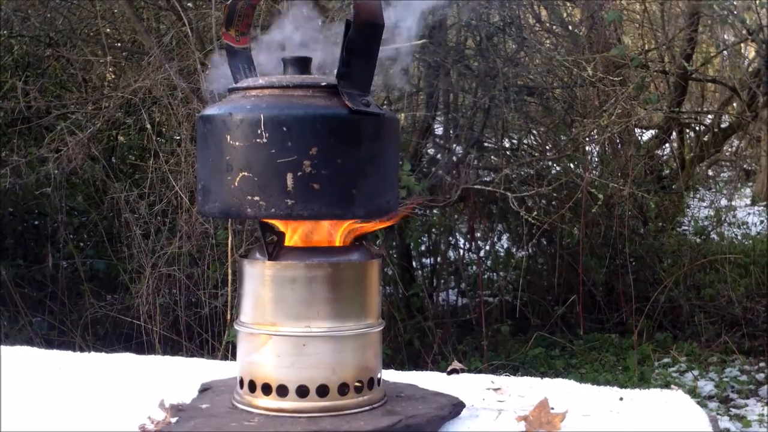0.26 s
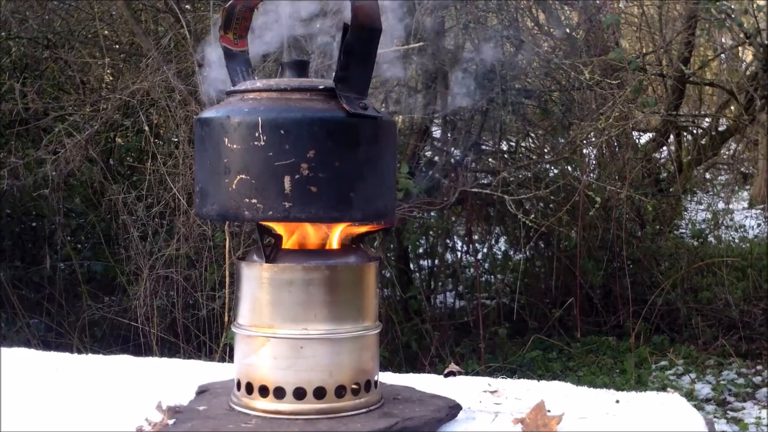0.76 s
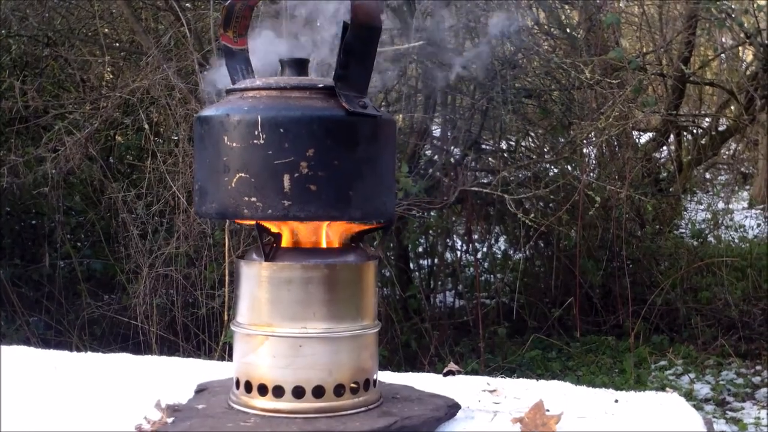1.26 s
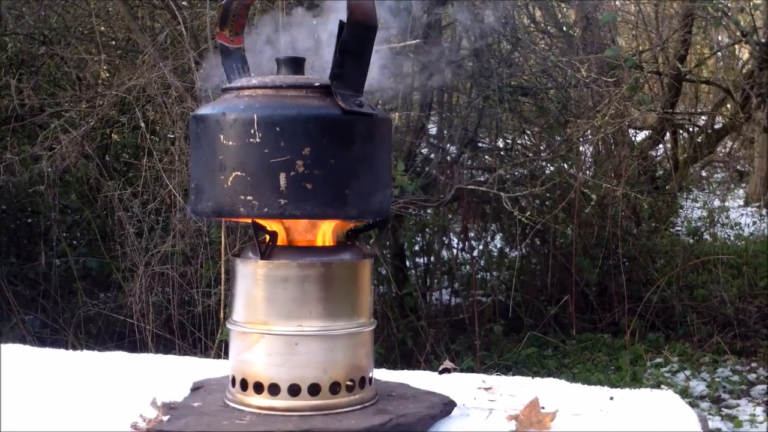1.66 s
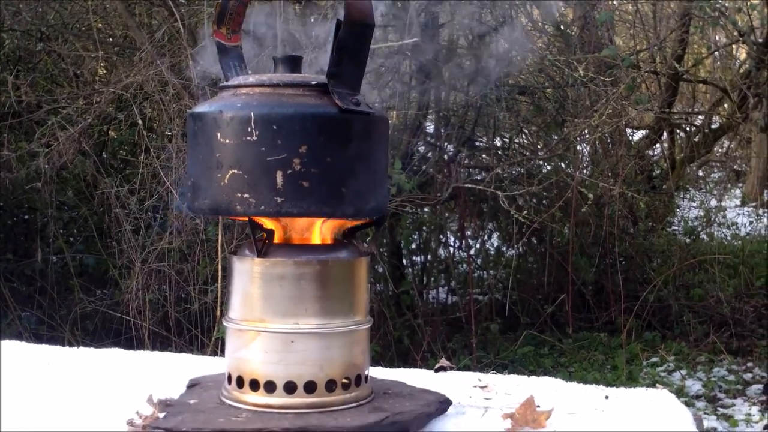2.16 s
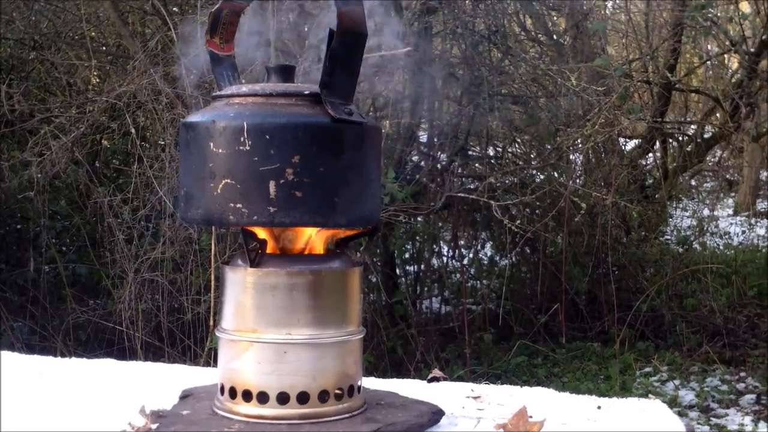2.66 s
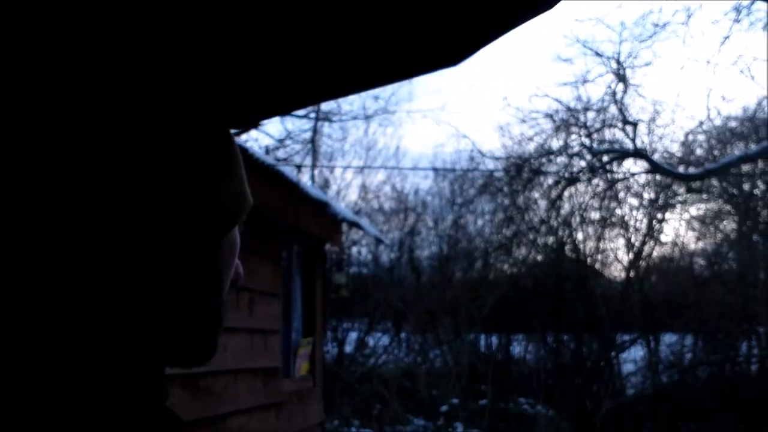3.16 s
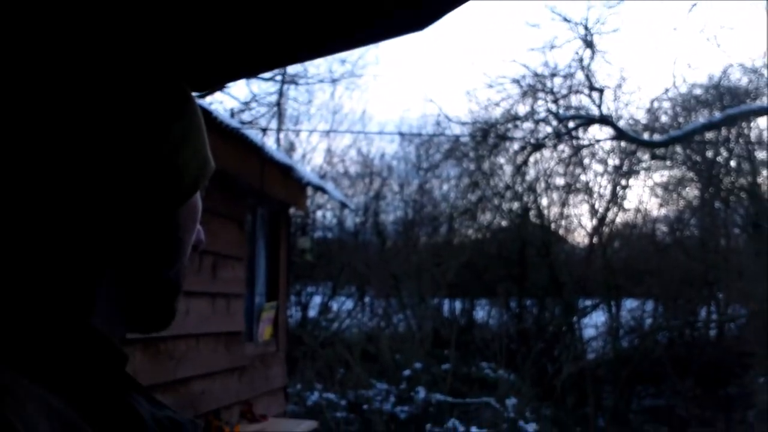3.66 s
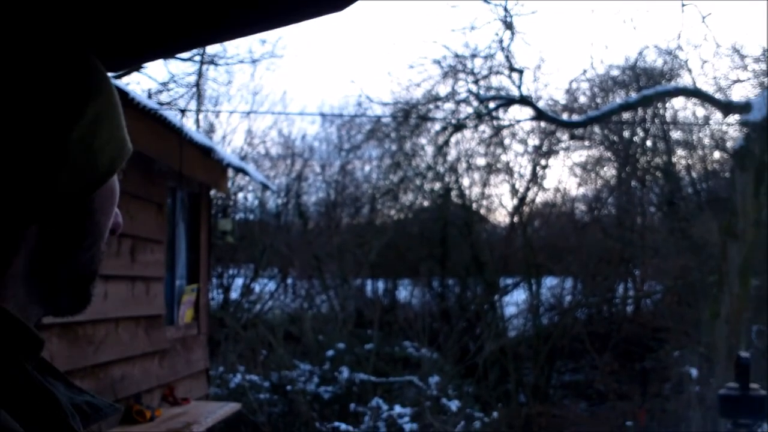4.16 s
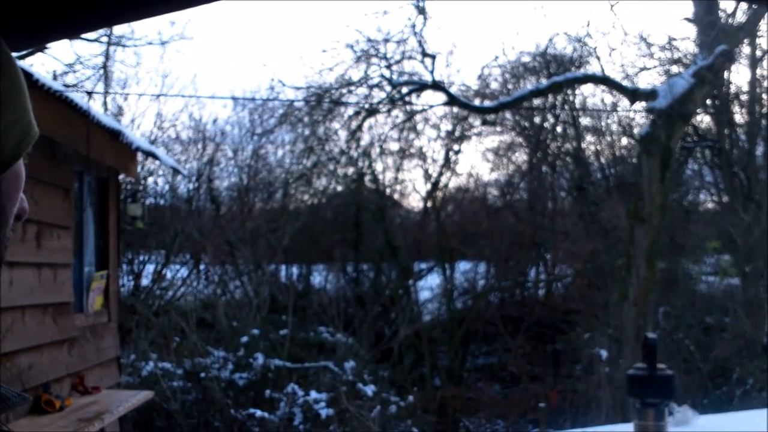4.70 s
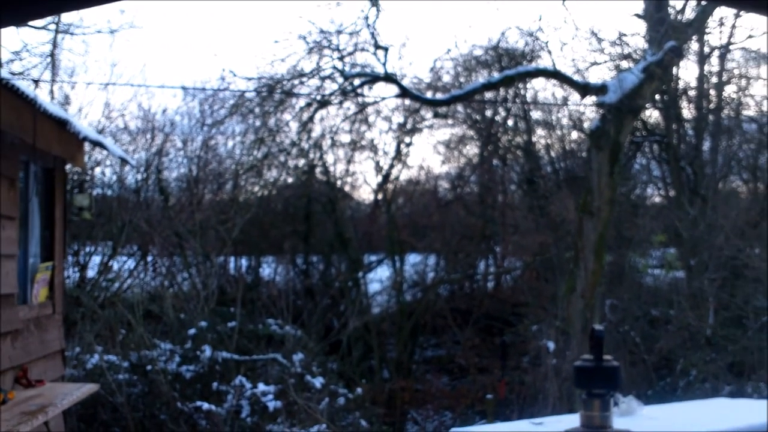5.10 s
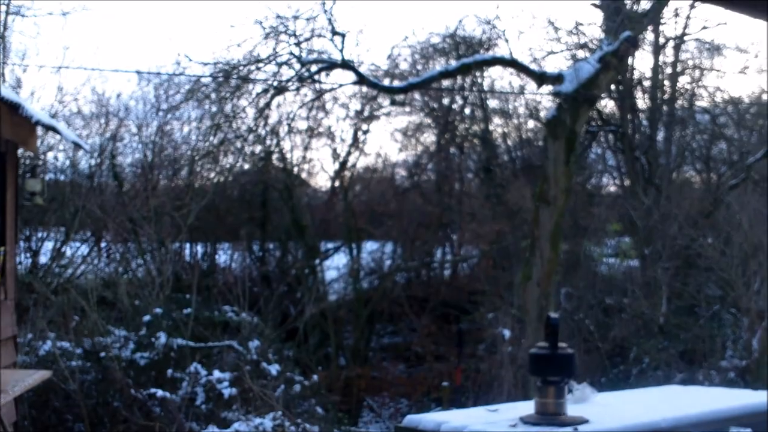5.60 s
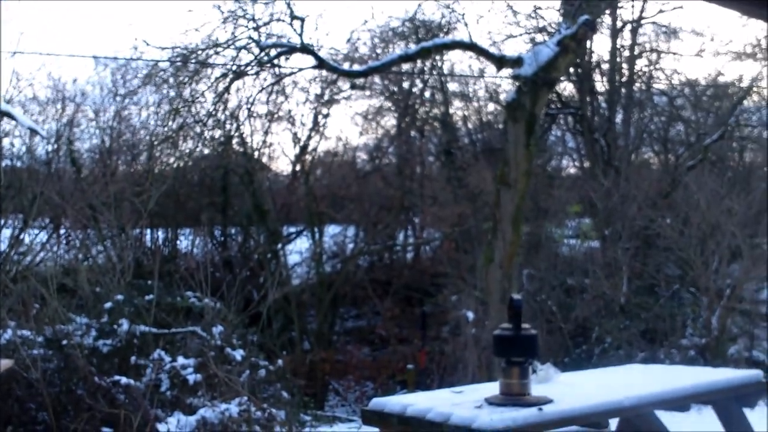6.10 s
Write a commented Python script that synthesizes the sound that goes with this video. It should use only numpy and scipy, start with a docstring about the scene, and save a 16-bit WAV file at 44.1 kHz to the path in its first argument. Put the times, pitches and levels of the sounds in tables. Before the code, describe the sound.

Close flame flutter and kettle steam hiss give way to faint outdoor ambience and sparse fire crackles, with wind bumping the microphone.

```python
"""Wood-gas stove and snowy garden

A small stove burns close by under a steaming kettle: flame flutter, gas roar, steam hiss round the lid.
It fades, the sound drops out briefly, and a quiet garden remains: distant wash, wood snapping in a fire
a few metres off, faint birds. Wind slowly pushes the microphone membrane in both scenes."""
import sys
import numpy as np
from scipy import signal
from scipy.fft import rfft, irfft
from scipy.io import wavfile
from scipy.ndimage import uniform_filter1d

SR = 44100
rng = np.random.default_rng(int(sys.argv[2]) if len(sys.argv) > 2 else 0)


def generate_wav(sig):
    """Save sig (samples, or channels by samples) to the path in sys.argv[1] as 16-bit PCM at SR."""
    pcm = np.round(np.clip(np.atleast_2d(sig).T, -1, 1) * 32767).astype(np.int16)
    wavfile.write(sys.argv[1], SR, pcm)


N = 279623
CUT_S, BACK_S = 125323 / SR, 131082 / SR  # drop-out start, end

# far traffic and hiss: f/Hz, density/dB
WASH_SPECTRUM = [(200, -15), (340, -6.5), (426, -4.5), (577, -5), (606, -4.5), (1010, -5), (1980, -15),
                 (2180, -16.5), (2440, -19), (8010, -22.5), (8670, -22), (15700, -26)]


def amp(db):
    return 10 ** (np.asarray(db) / 20)


def unit_rms(x):
    return x / np.sqrt(np.mean(x ** 2) + 1e-20)


def add(mix, start_s, sound):
    part = mix[round(start_s * SR):][:len(sound)]
    part += sound[:len(part)]


def curve(rows):
    """Gain through rows of t/s, level/dB."""
    times_s, db = np.transpose(rows)
    return amp(np.interp(np.arange(N) / SR, times_s, db))


def ramp(start_db, start_s, db_per_s):
    """Gain that holds until start_s, then slides."""
    return amp(start_db + db_per_s * np.maximum(np.arange(N) / SR - start_s, 0))


def wander(size, span):
    """Noise averaged over span points, rms 1."""
    return unit_rms(uniform_filter1d(rng.standard_normal(size), span))


def puffs(depth_db, length_s=.055):
    """Randomly swelling and sagging gain."""
    span = round(length_s * SR)
    return amp(depth_db * unit_rms(uniform_filter1d(wander(N, span), span)))


def spectrum_db(spectrum, hz):
    """Rows of f/Hz, density/dB, interpolated over log frequency."""
    f, db = np.transpose(spectrum)
    return np.interp(np.log(hz + .1), np.log(f + .1), db, left=-90, right=-90)


def coloured(spectrum, size=N):
    """Noise of the given spectrum, rms 1."""
    gain = amp(spectrum_db(spectrum, np.fft.rfftfreq(size, 1 / SR)))
    return unit_rms(irfft(rfft(rng.standard_normal(size)) * gain, size))


def patchy(spectrum, patchy_db, flicker_db):
    """Noise with time-frequency patches and a broadband flicker, rms 1."""
    frames, hz = N // 256 + 5, np.fft.rfftfreq(1024, 1 / SR)
    real, imag, patches = rng.standard_normal((frames, 513, 3)).T
    patches = unit_rms(uniform_filter1d(uniform_filter1d(patches, 10, 0), 10, 1))
    db = spectrum_db(spectrum, hz)[:, None] + patchy_db * patches + flicker_db * wander(frames, 3)
    _, noise = signal.istft((real + 1j * imag) * amp(db), nperseg=1024, noverlap=768)
    return unit_rms(noise[:N])


def resonate(x, hz, width_hz):
    """Two equal resonators in series, gain 1; hz may vary."""
    carrier = np.exp(2j * np.pi * np.cumsum(hz * np.ones(len(x))) / SR)
    pole = np.exp(-np.pi * width_hz / SR)
    for _ in range(2):
        x = 2 * (carrier * signal.lfilter([1 - pole], [1, -pole], x / carrier)).real
    return x


def ringing(spectrum, size):
    """Minimum-phase impulse response of a spectrum."""
    log_gain = np.log(amp(spectrum_db(spectrum, abs(np.fft.fftfreq(size, 1 / SR)))))
    return np.fft.ifft(np.exp(np.conj(signal.hilbert(log_gain)))).real


def glides(notes, slide_share, waver):
    """Wavering sines that reach their end pitch after slide_share of their length."""
    out = np.zeros(N)
    for start_s, length_s, start_hz, end_hz, db in notes:
        u = np.linspace(0, 1, round(length_s * SR))
        hz = start_hz + (end_hz - start_hz) * np.minimum(u / slide_share, 1)
        hz *= 1 + waver * wander(8820, 120)[:len(u)]
        tone = np.sin(2 * np.pi * np.cumsum(hz) / SR)
        add(out, start_s, amp(db) * tone * signal.windows.tukey(len(u), .4))
    return out


def background():
    """Deep rumble, swelling drone, far traffic wash and a thin steady whine."""
    # f/Hz, density/dB
    rumble_spectrum = [(15, -20), (24, -3), (35, -6), (50, -8), (72, -9), (97, -16), (115, -18), (150, -45)]
    drone_spectrum = [(65, -27), (110, -13.5), (134, 2), (156, -4), (183, -5), (263, -11), (324, -20),
                      (340, -28), (440, -59), (750, -120)]
    # t/s, level/dB
    rumble_levels = [(3, -41), (3.4, -39), (3.65, -40.5), (3.85, -36.5), (4.2, -42.5), (4.55, -37.5),
                     (4.75, -38), (5.0, -40), (5.3, -39), (5.6, -38.5), (5.85, -38.5), (6.0, -41),
                     (6.3, -36.5)]
    drone_levels = [(3, -47.5), (3.35, -42.5), (3.65, -45.5), (3.88, -45.5), (4.1, -47.5), (4.4, -44),
                    (4.55, -49), (5.1, -50), (5.55, -52.5), (5.8, -51.5), (6.3, -51)]
    # f/Hz, level/dB
    whine_tones = [(8536.6, -73), (8606.3, -81)]
    out = curve(rumble_levels) * puffs(depth_db=1.7) * coloured(rumble_spectrum)
    out += curve(drone_levels) * puffs(depth_db=1.5) * coloured(drone_spectrum)
    out += ramp(-51, BACK_S, db_per_s=-.5) * patchy(WASH_SPECTRUM, patchy_db=1.1, flicker_db=.6)
    for hz, db in whine_tones:
        out += amp(db) * unit_rms(np.sin(2 * np.pi * (hz * np.arange(N) / SR + rng.random())))
    return out


def birds():
    """Far, short falling notes."""
    # t/s, length/s, start f/Hz, end f/Hz, level/dB
    notes = [(3.508, .032, 2700, 2500, -57), (3.545, .015, 2500, 2450, -62)]
    return glides(notes, slide_share=1, waver=.012)


def rustles():
    """A ringing scrape and a far hoarse call: grainy bursts of resonant noise."""
    # t/s, length/s, f/Hz, width/Hz, level/dB
    bursts = [(3.18, .04, 4450, 250, -57), (3.18, .042, 4900, 250, -56), (3.18, .028, 6480, 250, -53),
              (3.185, .04, 5850, 400, -56), (3.198, .016, 9200, 500, -61), (5.75, .15, 2450, 450, -60)]
    out = np.zeros(N)
    for start_s, length_s, hz, width_hz, db in bursts:
        u = np.linspace(0, 1, round(length_s * SR))
        noise = unit_rms(resonate(rng.standard_normal(len(u)), hz, width_hz))
        grains = amp(2.5 * wander(len(u), 150))
        envelope = np.minimum(u / .2, 1) * np.sqrt(1 - u)
        add(out, start_s, amp(db) * noise * grains * envelope)
    return out


def wind_bumps():
    """Single puffs push the membrane to a sharp crest; it swings back."""
    # t/s, level/dB, width/s
    bumps = [(2.315, -11, 0.013), (3.8, -25.5, .008), (4.3, -19, 0.0067), (4.438, -14.5, 0.0094),
             (4.677, -14, 0.0089), (5.88, -22, 0.0068), (6.13, -27, .007)]
    out, t = np.zeros(N), np.arange(-.25, .25, 1 / SR)
    for crest_s, db, width_s in bumps:
        u = np.hypot(t / width_s, .3) / 2
        add(out, crest_s + t[0], amp(db) * (1 - u) * np.exp(-u))
    return out


def wind():
    """Gusts swing the membrane slowly. Apart from them, the signal steps up sharply into the drop-out, and a
    small step dies away after it."""
    # pressure swings: f/Hz, density/dB
    buffet_spectrum = [(1, 0), (4, 0), (9, 0), (15, -6), (22, -16), (32, -30), (60, -50)]
    # t/s, level/dB
    gust_peaks = [(1.05, -29.5), (1.83, -23), (2.35, -15), (2.68, -15), (3.05, -19.5), (3.48, -20.5),
                  (3.93, -21.5), (4.7, -22.5), (5.14, -26.5), (5.45, -20), (5.81, -23), (6.23, -27.5)]
    calm_db, rise_db_per_s, fall_db_per_s = -34, 54, 39.5
    t = np.arange(N) / SR
    peak_s, peak_db = np.transpose(gust_peaks)[:, :, None]
    gust_db = peak_db - np.where(t < peak_s, -rise_db_per_s, fall_db_per_s) * (t - peak_s)
    strength = amp(np.maximum(gust_db.max(axis=0), calm_db))
    swing = unit_rms(np.tanh(coloured(buffet_spectrum)))  # bounded: no rare huge swing
    build = np.exp(-np.maximum(CUT_S - t, 0) / .019)
    release = np.exp(-np.maximum(t - BACK_S, 0) / .095)
    offset_share = np.where(t < BACK_S, build, release)
    offset = np.where(t < BACK_S, .13, .016)
    return (1 - offset_share) * strength * swing + offset_share * offset


def wood_snap(db, low_hz, high_hz, first_top_hz, second_db, echo_db):
    """A break, tearing fibres and a second crack ring the wood; hut wall and table echo it."""
    # f/Hz, density/dB
    wood_spectrum = [(300, -36), (500, -19), (1200, -20), (1870, -22), (2400, -6), (3100, -15), (3450, -4),
                     (4200, 0), (4600, -11), (4860, -1), (6100, -6), (6750, 6.5), (7250, -20), (7650, -3),
                     (8000, -15), (9500, 1.5), (11300, -10.5), (12600, -9), (13800, -28), (15000, -15),
                     (17000, -23)]
    echo_spectrum = [(290, -35), (500, 0.5), (816, -6), (916, -18), (1260, -3), (1730, -18), (2370, -6),
                     (3260, -13), (6800, -4), (7310, -10), (9210, -6), (15700, -24)]
    first_t60_s, second_t60_s, echo_t60_s, second_delay_s = .011, .0086, .16, .0037
    t = np.arange(8820) / SR
    band = signal.butter(4, [low_hz, high_hz], "band", fs=SR, output="sos")
    lowpass = signal.butter(3, min(first_top_hz, .45 * SR), fs=SR, output="sos")
    fibres = .15 * rng.standard_normal(len(t))
    first = signal.sosfilt(lowpass, (t == 0) + fibres * amp(-60 * t / first_t60_s))
    age_s = t - second_delay_s
    second = fibres * (age_s > 0) * amp(second_db - 60 * abs(age_s) / second_t60_s)
    rung = signal.fftconvolve(first + second, ringing(wood_spectrum, size=2048))[:len(t)]
    crack = signal.sosfilt(band, rung)
    wall = 1 + .39 * np.exp(-((t - .025) / .0061) ** 2)  # one stronger reflection
    echo_gain = .5 * amp(echo_db - 60 * t / echo_t60_s) * (1 - np.exp(-t / .0025)) * wall
    echo = unit_rms(signal.sosfilt(band, coloured(echo_spectrum, size=len(t))))
    return amp(db) * (crack / abs(crack).max() + echo_gain * echo)


def crackling():
    """Wood snapping in a fire a few metres off."""
    # t/s, level/dB, low f/Hz, high f/Hz, first crack cutoff/Hz, second crack gain/dB, echo gain/dB
    snaps = [(3.033, -42, 8000, 15000, 20000, -16, -27), (3.346, -48, 3200, 5000, 20000, -8, -22),
             (3.35, -47, 7900, 12000, 20000, -8, -20), (3.45, -39.5, 6000, 12500, 20000, 0, -24),
             (3.591, -37, 7000, 15000, 20000, -8, -16), (4.0241, -11, 500, 19000, 20000, -10, -19.5),
             (4.3657, -39, 7540, 14000, 20000, -2, -15), (4.6096, -29.5, 3960, 19000, 7500, 7, -7),
             (5.322, -38, 6800, 14000, 20000, 7, -18), (6.049, -52, 8300, 10600, 20000, 0, 3),
             (6.215, -52, 8300, 10000, 20000, -3, 0)]
    out = np.zeros(N)
    for start_s, *settings in snaps:
        add(out, start_s, wood_snap(*settings))
    return out


def kettle_ring():
    """The steam jet excites slowly drifting shell and spout resonances, rms 1."""
    # f/Hz, width/Hz, gain/dB
    modes = [(3870, 50, -12), (4090, 90, -13), (4470, 42, -10), (4760, 70, -10), (5250, 130, -8),
             (5775, 40, -7), (5970, 80, -4), (6300, 200, -3), (7155, 70, -9), (8670, 80, -3),
             (9000, 80, -3), (9750, 120, -8), (11680, 70, -14)]
    jet = rng.standard_normal(N)
    drift = 1 + .003 * wander(N, round(.2 * SR))
    return unit_rms(sum(amp(db) * resonate(jet, hz * drift, width_hz) for hz, width_hz, db in modes))


def kettle_whistles():
    """Faint tones that slide up and hold."""
    # t/s, length/s, start f/Hz, end f/Hz, level/dB
    notes = [(.2, .17, 310, 315, -52), (.895, .105, 5330, 5780, -46.5), (2.12, .1, 5600, 5850, -53)]
    return glides(notes, slide_share=.33, waver=.0045)


def steam_hiss():
    """Steam escaping round the lid, rms 1."""
    # f/Hz, density/dB
    spectrum = [(2000, -45), (3000, -3), (3600, -11.5), (5000, -4.5), (6250, -1), (6480, 8), (6620, -18),
                (6900, -8.5), (7150, 0), (7420, -14), (7650, -5), (8700, 5), (11100, -8.5), (13500, -12.5),
                (15900, -12.5)]
    return patchy(spectrum, patchy_db=1.3, flicker_db=.3)


def gas_roar():
    """Broad noise of burning gas, rms 1."""
    # f/Hz, density/dB
    spectrum = [(88, -46.5), (150, -25), (172, -10.5), (311, -3.5), (426, -5.5), (509, -3.5), (1070, -2),
                (2010, -8), (3390, -18), (4000, -20), (5200, -22), (8800, -120)]
    return patchy(spectrum, patchy_db=1, flicker_db=-.04)


def flame_flutter():
    """The flapping flame flares, dips and dies down; its upper band swells separately."""
    # f/Hz, density/dB
    spectrum = [(16, -30), (26, -12), (35, 0), (44, -2), (50, -7), (58, -4), (72, -8), (97, -18),
                (130, -20), (165, -27), (250, -31), (320, -55)]
    # t/s, level/dB, upper band lift/dB
    flares = [(0, -31.5, -4.5), (.25, -27.5, -4.5), (.35, -38, -2), (.42, -33.5, 1.5), (.6, -33, 0.5),
              (.85, -34.5, -2), (1.05, -31, -3), (1.27, -32.5, -5.5), (1.42, -37, 0.5), (1.6, -32, -3.5),
              (1.75, -31, -2), (1.95, -40.5, 5.5), (2.15, -34, 1), (2.3, -33.5, 1), (2.5, -35.5, 5),
              (2.65, -33.5, 1), (2.8, -61, -3)]
    evenness, upper_hz = .28, 73.6
    times_s, level_db, lift_db = np.transpose(flares)
    flap = coloured(spectrum)
    envelope = uniform_filter1d(abs(signal.hilbert(flap)), 3000)
    flap = unit_rms(flap / envelope ** evenness)
    upper = signal.sosfiltfilt(signal.butter(2, upper_hz, "high", fs=SR, output="sos"), flap)
    level = curve(np.transpose([times_s, level_db]))
    lift = curve(np.transpose([times_s, lift_db]))
    return level * (flap + (lift - 1) * upper)


def stove():
    """Kettle ring, roar and hiss share one fade; flutter and whistles lie on top."""
    steady = amp(-11) * kettle_ring() + amp(-1.5) * gas_roar() + amp(-6.5) * steam_hiss()
    fade = ramp(start_db=-38.5, start_s=2.705, db_per_s=-150)
    return fade * steady + flame_flutter() + kettle_whistles()


def scene():
    """The garden comes up under the fading stove, at full level after the drop-out. Mono."""
    garden_start_s, rise_s, under_db = 2.7, .056, -3.5
    t = np.arange(N) / SR
    burning = stove() * (t < BACK_S)
    garden = background() + crackling() + rustles() + birds()
    rise = np.clip((t - garden_start_s) / rise_s, 0, 1) * amp(np.where(t < BACK_S, under_db, 0))
    return (burning + rise * garden + wind() + wind_bumps())[None]


def record(dry):
    """Drop-out with a faint dying murmur, then a steep low-pass."""
    murmur_db, hold_s, t60_s, cutoff_hz = -63, .022, .02, 15740
    t = np.arange(N) / SR
    murmur = coloured(WASH_SPECTRUM) * amp(murmur_db - 60 * np.maximum(t - CUT_S - hold_s, 0) / t60_s)
    interrupted = np.where((t >= CUT_S) & (t < BACK_S), murmur, dry)
    lowpass = signal.firwin(1535, cutoff_hz, window=("kaiser", 9), fs=SR)
    padded = np.pad(interrupted, ((0, 0), (767, 767)), "edge")
    return signal.oaconvolve(padded, lowpass[None], "valid")


dry = scene()
out = record(dry)
generate_wav(out)
```